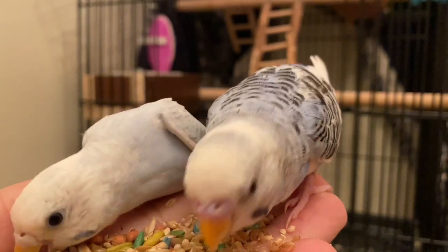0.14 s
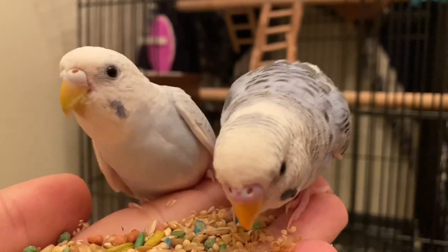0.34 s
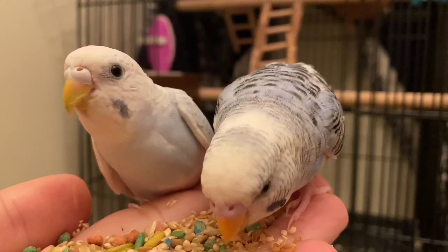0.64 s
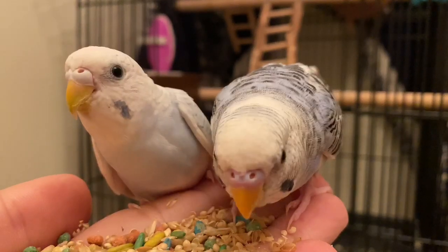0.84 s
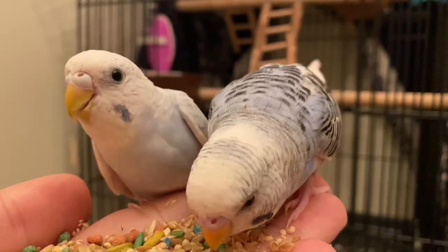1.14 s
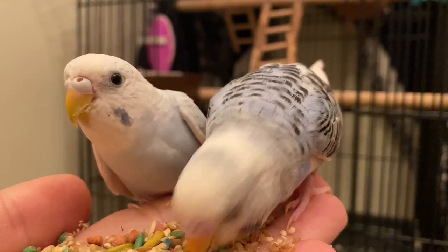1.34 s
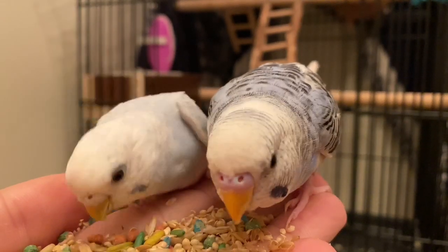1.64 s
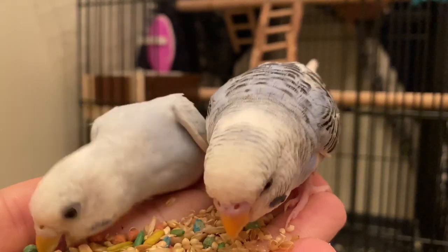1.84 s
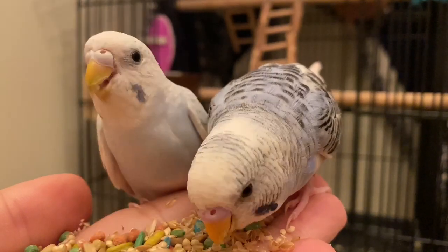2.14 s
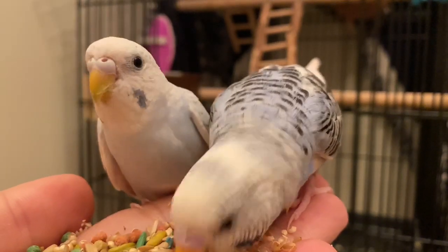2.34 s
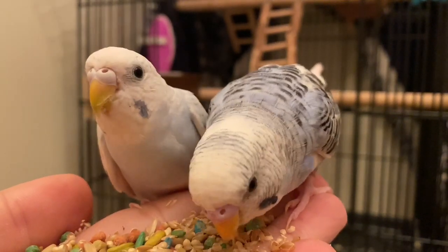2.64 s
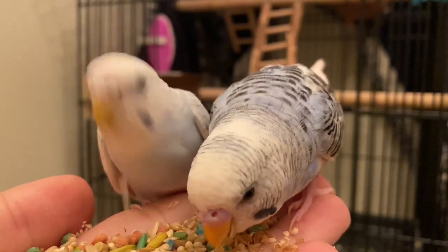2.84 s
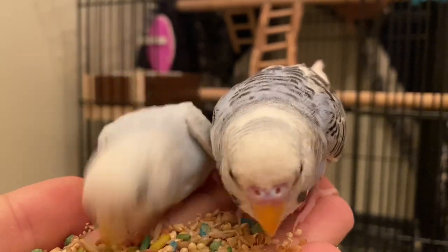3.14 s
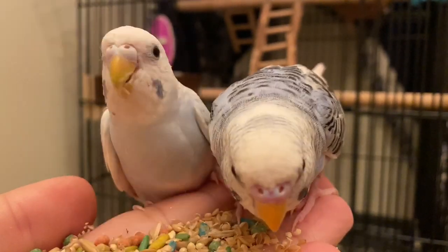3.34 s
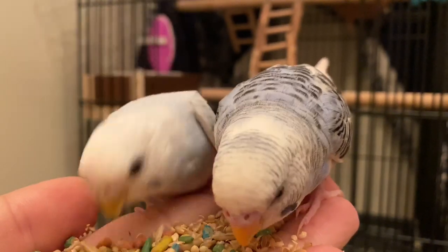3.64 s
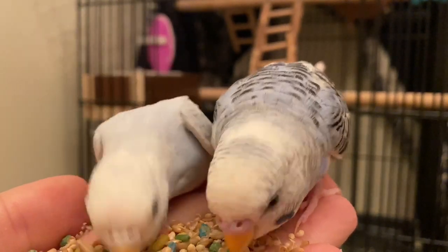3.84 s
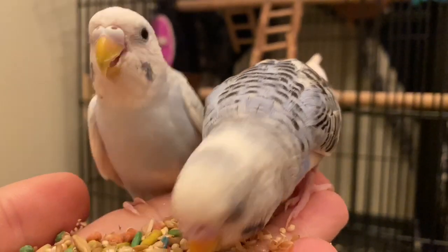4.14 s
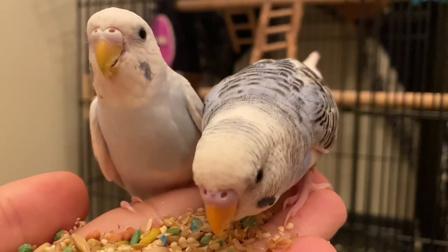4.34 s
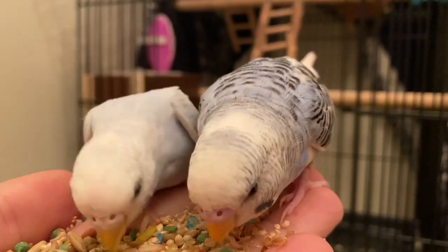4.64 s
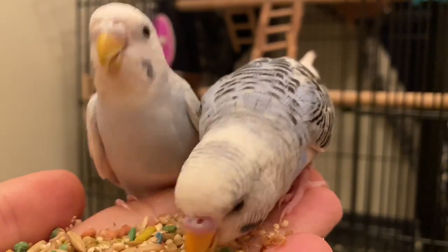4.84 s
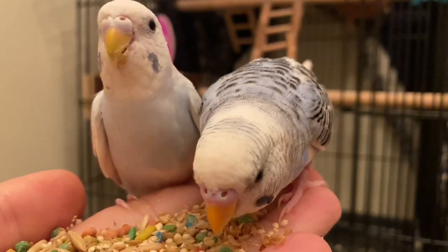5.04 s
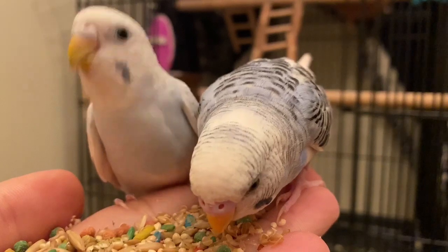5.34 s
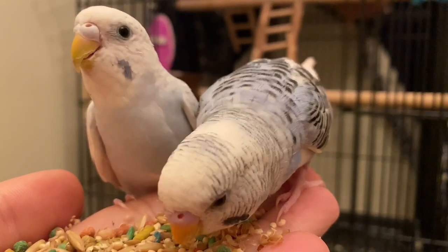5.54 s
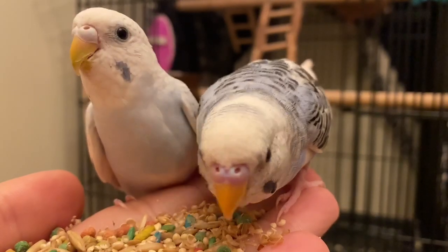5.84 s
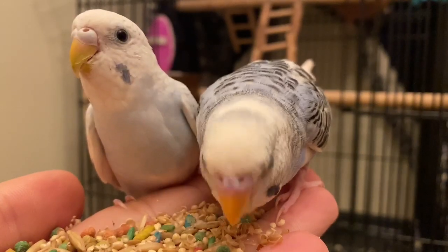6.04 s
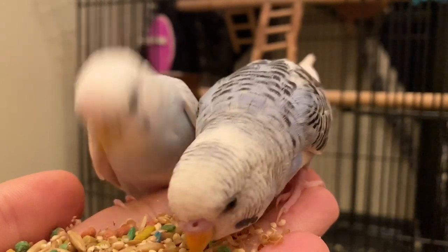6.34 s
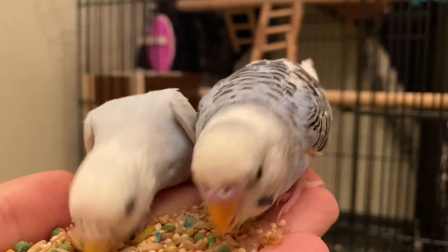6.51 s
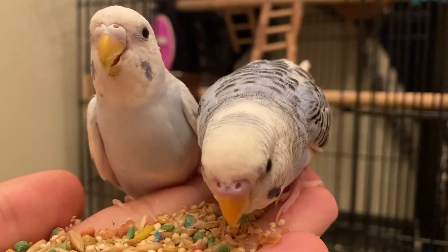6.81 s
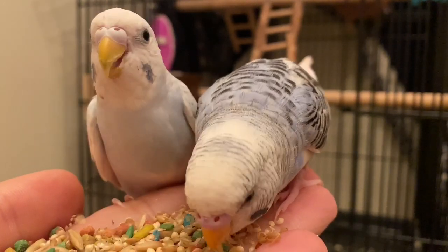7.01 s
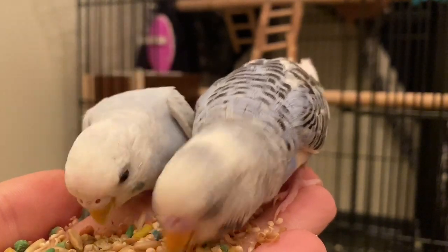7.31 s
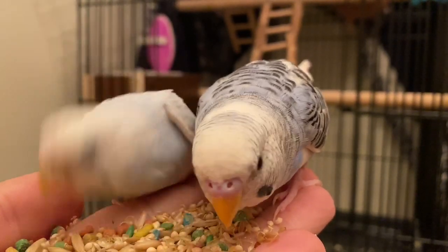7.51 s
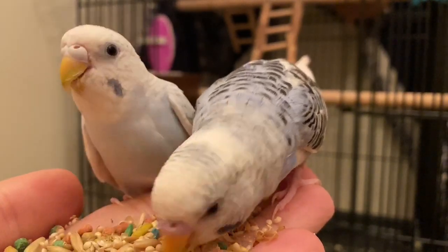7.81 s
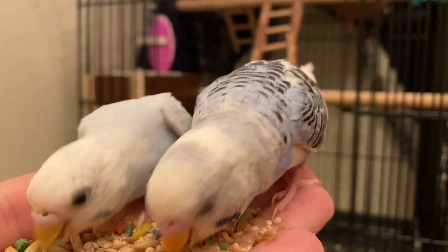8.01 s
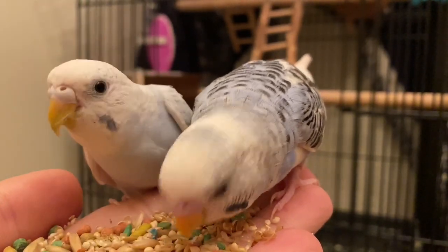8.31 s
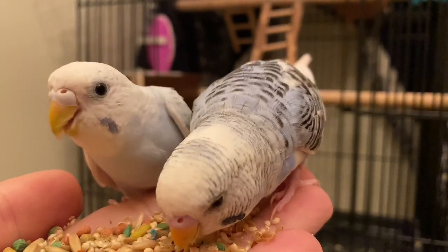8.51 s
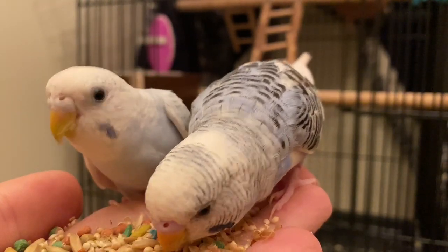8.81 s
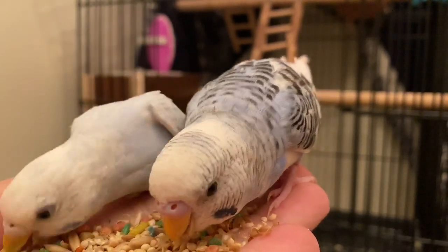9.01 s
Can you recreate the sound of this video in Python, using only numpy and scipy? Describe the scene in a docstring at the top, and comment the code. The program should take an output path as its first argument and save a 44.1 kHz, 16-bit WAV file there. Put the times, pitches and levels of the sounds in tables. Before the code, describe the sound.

Two small birds crack and husk dry seed up close, bright splintery clicks and faint rustling over a low steady machine hum.

```python
"""Seed rustles and machines hum in a quiet room, then two small parrots crack and husk the seed.
They eat from a hand close to a phone. Each crack is a splinter of clicks; the rustle is ticks and hiss.
Beaks knock and jab the palm, a husk pings off the cage; one machine drifts in speed and fades.
The treble of near sounds reaches the right port a quarter millisecond before the left."""
import sys
import numpy as np
from scipy import signal
from scipy.fft import rfft, irfft, next_fast_len
from scipy.io import wavfile
from scipy.ndimage import uniform_filter1d

SR = 44100
rng = np.random.default_rng(int(sys.argv[2]) if len(sys.argv) > 2 else 0)


def output_pcm(signal):
    """Save a mono or channel-first signal as 16-bit PCM at the path in sys.argv[1].

    Samples are clipped to [-1, 1] before scaling.
    """
    pcm = np.clip(np.atleast_2d(signal).T, -1, 1) * 32767
    wavfile.write(sys.argv[1], SR, np.round(pcm).astype(np.int16))


N = 403936  # length in samples

# bouts of a beak working the seed: (start [s], hold [s], rms of the fizz before the ports [dB])
WORKING_BOUTS = [(0, 0.13, -67), (0.307, .18, -70.5), (0.525, 0.44, -68.5), (0.83, 0.054, -88),
                 (1.1, 0.045, -73.5), (1.31, 0.11, -78.5), (1.578, 0.32, -71.5), (2.03, 0.49, -75.5),
                 (2.38, .07, -70.5), (2.558, 0.09, -62), (2.792, 0.21, -79), (3.026, 0.068, -58.5),
                 (3.284, .2, -69), (3.616, 0.1, -74), (3.86, 0.32, -72), (4.395, 0.36, -68),
                 (4.885, 0.13, -71), (5.196, 0.22, -70.5), (5.492, 0.056, -70), (5.735, 0.1, -70.5),
                 (6.022, 0.35, -84), (6.415, 0.18, -68), (6.832, .1, -63), (7.254, 0.035, -78),
                 (7.45, 0.046, -63), (7.654, 0.027, -78), (7.848, .04, -74), (8.037, 0.065, -69.5),
                 (8.237, 0.27, -62.5), (8.612, 0.033, -65.5), (8.92, .23, -67)]
# colour of the bright fizz: (frequency [Hz], relative level [dB])
FIZZ_COLOUR = [(6000, -20.5), (8000, 3.5), (10500, -10), (13000, -6), (15300, 4.5), (15800, -15),
               (16100, -46.5)]
# colour of the duller shuffle: (frequency [Hz], relative level [dB])
SHUFFLE_COLOUR = [(800, -12), (1300, -7), (1900, 6), (2400, -7), (4000, -3.5), (6500, -5.5), (9000, -13.5)]
# level gap between the ports for a near sound: (frequency [Hz], left minus right [dB])
PORT_LEVEL_GAP = [(300, 0), (700, 4), (1400, 7), (3100, 5), (6000, 4), (8000, 0), (15000, 0)]
# phase gap between the ports for a near sound: (frequency [Hz], lead of the left port [radians])
PORT_PHASE_LEAD = [(0, 0), (1380, -1.5), (3100, .5), (5860, .8), (6800, -.5), (8200, -3.14), (12100, -9.42),
                   (15600, -15.2), (16700, -15.8)]
# steady machine tones: (frequency [Hz], rms before wavering [dB], wavering [dB])
STEADY_HUM = [(52.03, -54, 0.4), (67.5, -59.5, 2.5), (105.9, -72, 3), (156.9, -60.5, 1.07), (231, -72.5, 3),
              (238.9, -71, 3), (289, -79.5, 4), (363, -82, 1), (482, -83, -1), (755, -88.5, 3.5)]
# a second machine whose speed drifts and which fades: (time [s], frequency [Hz], rms before wavering [dB])
DRIFTING_HUM = [(0, 136.4, -61.5), (1.2, 136.6, -63), (2.2, 134.7, -61.5), (3.5, 132.7, -67.5),
                (5, 132.3, -65.5), (7.5, 133.6, -80.5), (9.16, 132, -92)]
# a faint low tone that slides up: (time [s], frequency [Hz], rms [dB])
RISING_TONE = [(0, 85.8, -88), (.9, 87.9, -59.5), (2, 92, -62.5), (2.4, 93.4, -77), (3, 95, -115.5)]
# colour of the room noise: (frequency [Hz], relative level [dB])
AIR_COLOUR = [(25, -12), (40, -7), (62, 2), (80, -7), (160, -8.5), (326, -19.5), (754, -27), (1040, -39.5),
              (1900, -41.5), (2500, -48.5), (6000, -55.5), (9000, -58.5), (16000, -79.5)]
# how alike the room noise is left and right: (frequency [Hz], likeness [0 to 1])
AIR_LIKENESS = [(60, 0.99), (150, 0.72), (380, 0.39), (950, 0), (15000, 0)]
# seed cracks: (time [s], shell snap [dB], husk [dB], kernel [dB])
SEED_CRACKS = [(.316, -46, -44, -47), (.3336, -43, -37, -59), (.352, -51, -39, -47),
               (.4765, -43.5, -43, -53), (0.5505, -38.5, -34, -43.5), (.617, -37, -43, -58),
               (0.6294, -35, -31, -46), (.6932, -35, -37, -47), (.7301, -28.5, -26.5, -43),
               (0.8307, -25, -22.5, -23.5), (0.8613, -60, -61, -42), (1.1735, -40, -59, -41),
               (1.27, -52, -57, -48.5), (1.419, -62, -71, -43), (1.576, -34.5, -39, -43),
               (1.649, -31.5, -51, -67), (1.745, -25, -41, -62), (1.9362, -22.5, -24, -20.5),
               (2.002, -44.5, -36, -35), (2.1615, -44, -75, -48), (2.233, -61, -57, -44.5),
               (2.356, -46, -43, -54), (2.54, -26, -28, -35), (2.554, -46, -43, -38),
               (2.563, -26, -28.5, -31), (2.6, -46, -37, -40), (2.6505, -16, -34, -32),
               (2.8803, -60, -53, -43), (3.0438, -50, -40, -41), (3.2126, -21.5, -57, -35),
               (3.29, -34.5, -39, -57), (3.3211, -46.5, -29.5, -52), (3.42, -29, -29, -39.5),
               (3.4336, -33, -27.5, -36), (3.641, -22.5, -32.5, -30), (3.9247, -9, -12, -22.5),
               (3.9515, -38, -39, -40), (4.0031, -33, -33.5, -42), (4.2987, -10, -18.5, -22),
               (4.3459, -53, -40, -48), (4.415, -49, -37, -48.5), (4.4949, -21.5, -37, -39),
               (4.578, -32.5, -43, -64), (4.6421, -36.5, -39, -40.5), (4.7528, -50.5, -43, -46.5),
               (4.8811, -30, -28, -32.5), (4.9642, -45.5, -35.5, -69), (5.0384, -47, -36.5, -43.5),
               (5.1697, -31, -33, -24.5), (5.1754, -27.5, -35, -36), (5.327, -37, -46, -61),
               (5.3346, -21, -28, -39), (5.397, -44, -42, -42), (5.8985, -35.5, -35, -47),
               (5.9247, -25.5, -18, -21.5), (5.935, -45, -45, -41), (6.0798, -42, -38, -58),
               (6.2041, -29, -45, -52), (6.266, -46, -41, -43), (6.283, -29, -53, -30.5),
               (6.353, -58, -55, -45), (6.4899, -44, -57, -44), (6.6207, -31.5, -29, -40),
               (6.6997, -24, -26, -40), (6.7081, -32.5, -39, -40.5), (6.7648, -39, -42, -53),
               (6.8126, -24, -15.5, -23), (6.891, -38.5, -25, -27), (6.944, -49, -33.5, -48),
               (7.055, -34, -46, -32.5), (7.4072, -44, -41.5, -42.5), (7.5325, -48, -50, -45),
               (7.5556, -13, -17, -22.5), (7.653, -33.5, -29.5, -38.5), (7.6795, -35.5, -38, -42.5),
               (7.709, -42.5, -39.5, -45.5), (8.02, -52.5, -61, -50), (8.0415, -49, -42, -45),
               (8.0553, -50.5, -46, -40.5), (8.121, -62, -59, -47), (8.209, -30, -40, -34),
               (8.2125, -25, -27.5, -45), (8.2198, -44, -43, -41), (8.2561, -42, -37, -35.5),
               (8.2845, -40, -46, -57), (8.2996, -32, -36, -50), (8.3028, -24.5, -23.5, -45),
               (8.3214, -32.5, -31, -34), (8.328, -45, -39, -41), (8.3729, -39, -32, -50),
               (8.3883, -22, -23, -32), (8.4036, -45, -45, -35), (8.4101, -36, -41, -53),
               (8.4583, -25.5, -32, -43), (8.491, -42.5, -40, -36), (8.5484, -37.5, -58, -53),
               (8.6124, -32, -46, -35), (8.6865, -44.5, -42, -40), (9.0851, -41, -42, -54),
               (9.1359, -47, -44.5, -47)]
# how fast the room dies away: (frequency [Hz], time to fall 60 dB [s])
ROOM_DECAY = [(500, 0.18), (2000, 0.15), (6000, 0.12), (15000, 0.045)]
# the beak snaps shut with a hollow knock: (time [s], level [dB])
BEAK_KNOCKS = [(.617, -40.5), (1.1735, -46.5), (2.6, -43), (3.3213, -47.5), (3.641, -41), (3.9517, -43),
               (5.3968, -50), (6.4906, -43), (6.8125, -55), (8.2206, -44.5), (8.4035, -45.5), (8.4905, -43),
               (8.6332, -49.5)]
# beak jabs into the palm: (time [s], level [dB])
PALM_JABS = [(0.831, -39.5), (1.937, -38.5), (2.558, -48), (3.642, -44), (3.924, -36), (4.299, -42),
             (4.878, -45.5), (5.169, -50.5), (5.924, -48), (7.055, -43)]
# a husk bounces on cage metal: (time [s], level [dB])
HUSK_PINGS = [(5.516, -60.5), (5.568, -61.5)]
# ring of the cage wires: (frequency [Hz], level relative to the ping [dB], time to fall 60 dB [s])
CAGE_METAL = [(2810, -21, 0.16), (3770, -16, 0.13), (4530, -9, 0.21), (5260, -8, 0.23), (6200, -20, 0.39),
              (7106, -31, 0.1), (7450, -27, 0.24), (10100, -26, 0.11), (11140, -8, 0.15)]

# a bout starts quickly and dies away to near silence
RISE_DB_PER_S, FALL_DB_PER_S, REST_DB = 504, 141, -93
# crumbs that scatter after a crack, relative to the husk's level
CRUMBS_DB, CRUMBS_FALL_DB_PER_S = -41.5, 129
AIR_RMS_DB = -56.5
# (low Hz, high Hz) of the shell's snap, the husk, the kernel and the beak
SNAP_HZ, HUSK_HZ, KERNEL_HZ, BEAK_HZ = (14300, 16700), (8600, 12800), (2800, 7600), (1200, 2400)
# the beak's knock relative to the kernel, and how much it varies
BEAK_DB, BEAK_SPREAD_DB = -13.5, 3
ROOM_DB = -14  # room tail relative to the beak sounds
EDGE_HZ = 16450  # upper band limit


def amp(db):
    """Turns decibels into a plain multiplier."""
    return 10 ** (np.asarray(db) / 20)


def evened(x):
    """Scales a sound to rms 1."""
    return x / np.sqrt(np.mean(x ** 2) + 1e-20)


def read(points, hz):
    """Reads a table between its points, along a logarithmic frequency scale."""
    f, value = np.transpose(points)
    return np.interp(np.log(hz + 1), np.log(f + 1), value)


def curve(rows, axis):
    """Joins one column of a timed table into a value for every sample."""
    rows = np.array(rows)
    return np.interp(np.arange(N) / SR, rows[:, 0], rows[:, axis])


def band(x, lo_hz, hi_hz):
    """Keeps mainly the frequencies between two edges."""
    return signal.sosfilt(signal.butter(2, [lo_hz, hi_hz], "band", fs=SR, output="sos"), x)


def coloured(x, gain):
    """Multiplies the spectrum of x by gain(Hz)."""
    size = next_fast_len(N)
    spectrum = rfft(x, size) * gain(np.fft.rfftfreq(size, 1 / SR))
    return irfft(spectrum, size)[..., :N]


def slow(rate_hz):
    """Chance that wanders at up to about rate_hz, rms 1."""
    return evened(coloured(rng.standard_normal(N), lambda hz: np.exp(-(hz / rate_hz) ** 2)))


def stir():
    """Level in dB of the stirred seed: bouts rise, hold and fall; a crack's crumbs start at once and fall."""
    t = np.arange(0, N / SR + .002, .002)
    start, hold, db = np.transpose(WORKING_BOUTS)[:, :, None]
    rise = RISE_DB_PER_S * np.maximum(start - t, 0)
    fall = FALL_DB_PER_S * np.maximum(t - start - hold, 0)
    bouts = amp(db - rise - fall)
    s, _, husk_db, _ = np.transpose(SEED_CRACKS)[:, :, None]
    crumbs_fall = CRUMBS_FALL_DB_PER_S * np.maximum(t - s, 0)
    crumbs = (t > s) * amp(husk_db + CRUMBS_DB - crumbs_fall)
    power = (bouts ** 2).sum(0) + (crumbs ** 2).sum(0) + amp(REST_DB) ** 2
    return np.interp(np.arange(N) / SR, t, 10 * np.log10(power))


def coloured_grains(sound, colour):
    """Makes short patches of sound and pitch range louder or softer, then colours the layer, at rms 1."""
    _, _, z = signal.stft(sound, SR, nperseg=128)
    patches = rng.standard_normal(z.shape[1:])
    patches = uniform_filter1d(patches, 14, axis=0)  # smooth across frequency
    patches = evened(uniform_filter1d(patches, 4, axis=1))  # smooth across time
    sound = signal.istft(z * amp(4 * patches), SR, nperseg=128)[1][:, :N]
    return evened(coloured(sound, lambda hz: amp(read(colour, hz))))


def rustle():
    """Tiny ticks in clumps over a hiss: the fizz is shared; the duller shuffle differs by port and swells less."""
    stir_db, clumps = stir(), amp(4 * slow(25))
    size = amp(8.2 * np.minimum(rng.exponential(1, N), 3))
    ticks = (rng.random(N) < 160 * clumps / SR) * size  # about 160 a second, more in clumps
    # each tick is a brief noise puff that dies over 0.56 ms
    puffs = signal.lfilter([1], [1, -np.exp(-1 / (0.00056 * SR))], ticks)
    crumble = evened(puffs * rng.standard_normal(N))
    hiss = rng.standard_normal((3, N)) * evened(clumps)
    fizz = coloured_grains(1.74 * crumble + hiss[:1], FIZZ_COLOUR)
    # one shared hiss, plus one of its own for each port
    shuffle = coloured_grains(1.46 * crumble + 1.1 * hiss[0] + 1.3 * hiss[1:], SHUFFLE_COLOUR)
    shuffle_db = -79.0 + 0.54 * (stir_db + 81.5)
    return fizz * amp(stir_db) + shuffle * amp(shuffle_db)


def ports(near):
    """Level and phase gap between the two microphone ports for a source at the hand."""
    side = np.array([[.5], [-.5]])  # left gets half of each gap, right the opposite half
    f, lead = np.transpose(PORT_PHASE_LEAD)

    def gap(hz):
        level = amp(side * read(PORT_LEVEL_GAP, hz))
        return level * np.exp(1j * side * np.interp(hz, f, lead))

    return coloured(near, gap)


def tone(hz, db):
    """A sine with rms db; adding up its frequency lets the pitch drift smoothly."""
    turns = np.cumsum(hz * np.ones(N)) / SR + rng.random()
    return np.sqrt(2) * amp(db) * np.sin(2 * np.pi * turns)


def machines():
    """Sines that waver, a drifting machine with a weaker octave, and a rising tone; slightly louder right."""
    hum = sum(tone(hz, db + waver_db * slow(1.95)) for hz, db, waver_db in STEADY_HUM)
    hz, db = curve(DRIFTING_HUM, axis=1), curve(DRIFTING_HUM, axis=2)
    drifting = tone(hz, db + 4.6 * slow(7.0))
    octave = tone(2 * hz, db - 7.5 + 3 * slow(3.5))
    rising = tone(curve(RISING_TONE, axis=1), curve(RISING_TONE, axis=2))
    return (hum + drifting + octave + rising) * amp([[-.45], [.45]])


def air():
    """Steady room noise, near mono in the bass and wide above."""
    left, other = rng.standard_normal((2, N))

    def same(hz):
        return np.clip(read(AIR_LIKENESS, hz), -1, 1)

    right = coloured(left, same) + coloured(other, lambda hz: np.sqrt(1 - same(hz) ** 2))
    noise = coloured(np.array([left, right]), lambda hz: amp(read(AIR_COLOUR, hz)))
    return amp(AIR_RMS_DB) * evened(noise)


def struck(clicks, lo_hz, hi_hz):
    """Clicks through a band whose ring peaks at the height of the click."""
    ring = band(np.arange(2048) == 0, lo_hz, hi_hz)
    return band(clicks, lo_hz, hi_hz) / abs(ring).max()


def splinters(s, db, spread_s, count):
    """Each event breaks into a few clicks of random sign, the first strongest; db sets their energy."""
    late, sign = rng.random((len(s), count, 2)).T
    late[0] = 0  # the first click is on time
    size = np.sign(sign - .5) * np.where(late > 0, 0.68 * np.exp(-late), 1)
    size *= amp(db) / np.linalg.norm(size, axis=0)
    at = np.minimum(((s + late * spread_s) * SR).astype(int), N - 1)
    return np.bincount(at.ravel(), size.ravel(), N)


def cracks():
    """Snap and husk start alike for both ports; lower knocks scatter off hand and birds apart for each."""
    s, snap_db, husk_db, kernel_db = np.transpose(SEED_CRACKS)
    beak_db = kernel_db + BEAK_DB + BEAK_SPREAD_DB * rng.standard_normal(len(s))
    # hard cracks are sudden, soft ones crumble
    spread_s = 0.0022 * np.clip((-14.5 - snap_db) / 30, .2, 1.5)
    snap = struck(splinters(s, snap_db, spread_s, count=5), *SNAP_HZ)
    husk = struck(splinters(s, husk_db, spread_s, count=5), *HUSK_HZ)
    out = snap + husk
    for db, edges in (kernel_db, KERNEL_HZ), (beak_db, BEAK_HZ):
        left, apart = (struck(splinters(s, db, spread_s + .0004, count=4), *edges) for _ in "LR")
        out = out + np.array([left, .8 * left + .6 * apart])
    return out


def room(x):
    """Noise tails in which each band dies at its own speed; both ports share most of the treble."""
    taps = rng.standard_normal((2, SR // 3))
    hz, t, z = signal.stft(taps, SR, nperseg=128)
    share = 1 / (1 + (7000 / (hz + 1)) ** 4)[:, None]
    z[1] = share * z[0] + np.sqrt(1 - share ** 2) * z[1]
    fading = z * amp(-60 * t / read(ROOM_DECAY, hz)[:, None])
    tail = signal.istft(fading, SR, nperseg=128)[1]
    # the walls' answer grows over the first 6 ms
    tail *= np.clip(np.arange(tail.shape[1]) / SR / .006, 0, 1)
    return signal.oaconvolve(x, tail / np.linalg.norm(tail[0]), axes=1)[:, :N]


def knocks():
    """Only the hollow of the beak rings as it snaps shut."""
    s, db = np.transpose(BEAK_KNOCKS)
    return struck(splinters(s, db, .0012, count=4), *BEAK_HZ)


def jabs():
    """A soft push on skin: a broad low thump."""
    s, db = np.transpose(PALM_JABS)
    return struck(splinters(s, db, 0.00012, count=2), 210, 666)


def pings():
    """A dull tick of noise and the rough ring of thin wires in close bundles, heard from a distance."""
    t, out = np.arange(8000) / SR, np.zeros((2, N))
    for s, level_db in HUSK_PINGS:
        tick = band(rng.standard_normal((2, len(t))), 660, 11000)
        ring = amp(6.5 - 60 * t / 0.11) * tick
        for hz, db, t60 in CAGE_METAL:
            # five slightly mistuned wires, each with its own phase at each port
            wires = hz * (1 + .018 * rng.standard_normal((5, 1, 1)))
            bundle = np.sin(2 * np.pi * (wires * t + rng.random((5, 2, 1)))).sum(0)
            ring = ring + amp(db - 60 * t / t60) * bundle
        onset = np.minimum(t / 0.0011, 1)
        out[:, round(s * SR):][:, :len(t)] += amp(level_db) * ring * onset
    return out


def scene():
    """Near sounds pass through the ports; pings, machines and air are added as they are."""
    beaks = cracks() + knocks() + jabs()
    near = beaks + amp(ROOM_DB) * room(beaks) + rustle()
    return ports(near) + pings() + machines() + air()


def record(dry):
    """The band limit: a steep filter takes away the highest treble."""
    lowpass = signal.firwin(127, EDGE_HZ, window=("kaiser", 9), fs=SR)
    return signal.oaconvolve(dry, lowpass[None], "same")


dry = scene()
out = record(dry)
output_pcm(out)
```